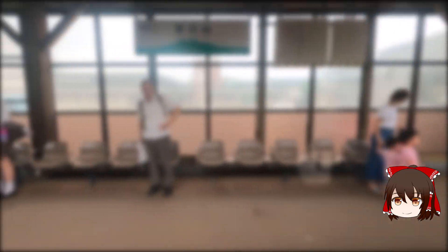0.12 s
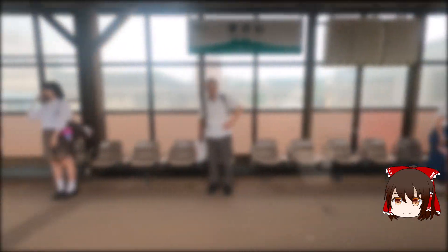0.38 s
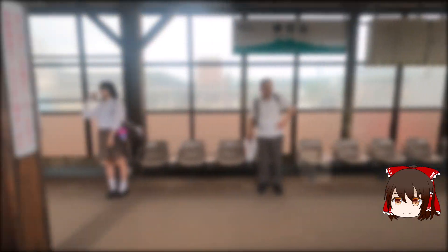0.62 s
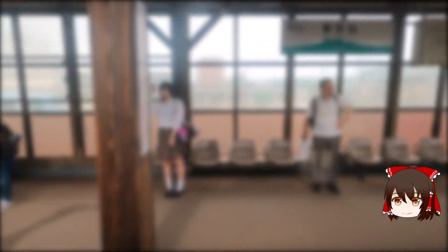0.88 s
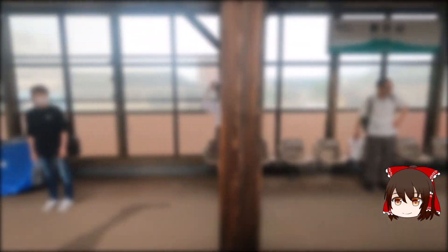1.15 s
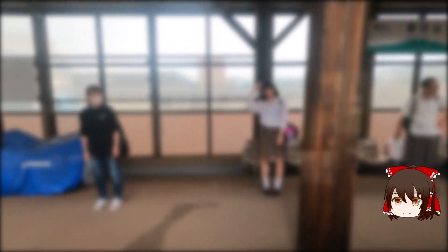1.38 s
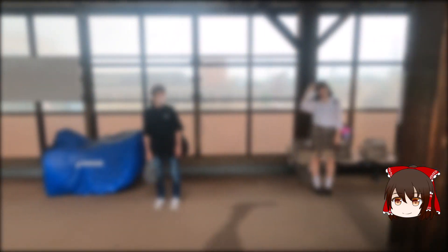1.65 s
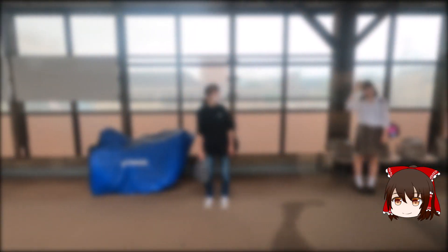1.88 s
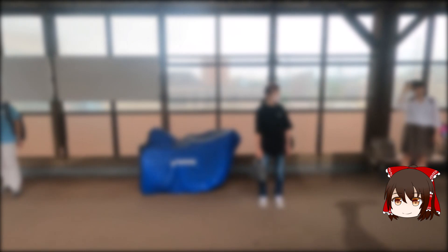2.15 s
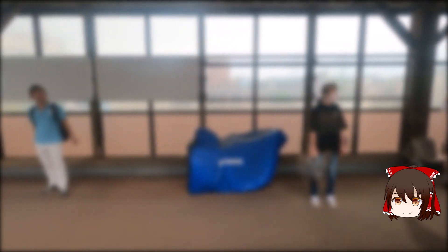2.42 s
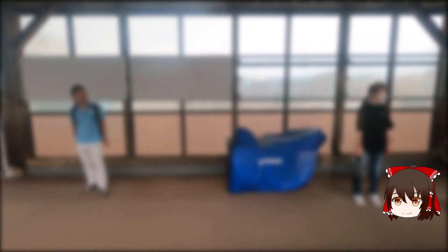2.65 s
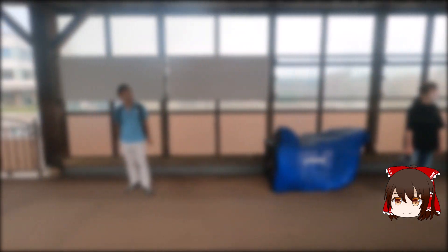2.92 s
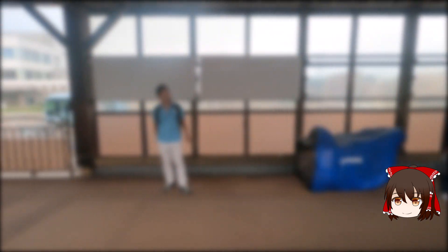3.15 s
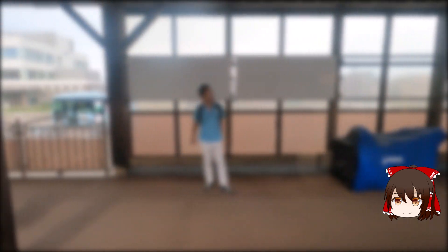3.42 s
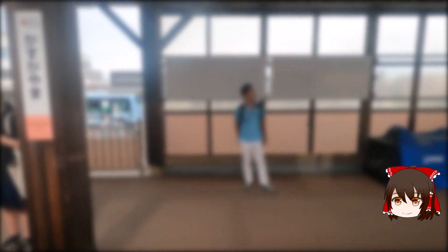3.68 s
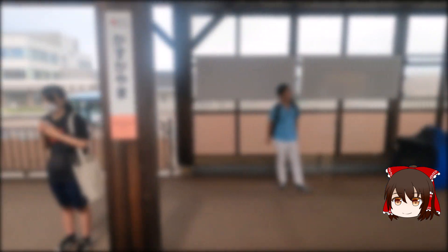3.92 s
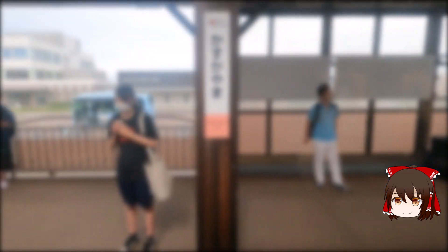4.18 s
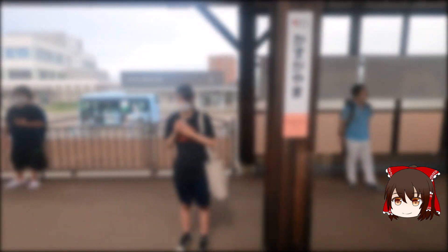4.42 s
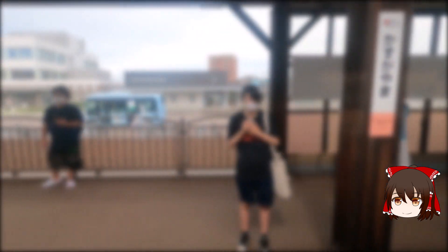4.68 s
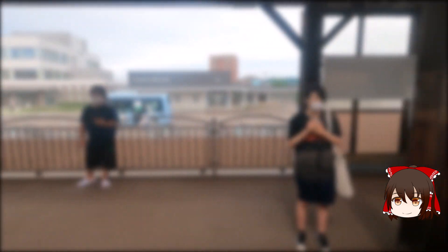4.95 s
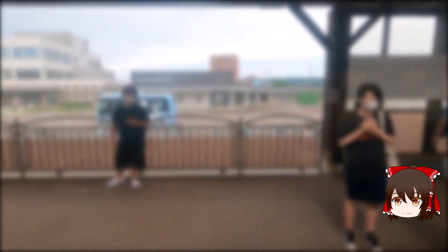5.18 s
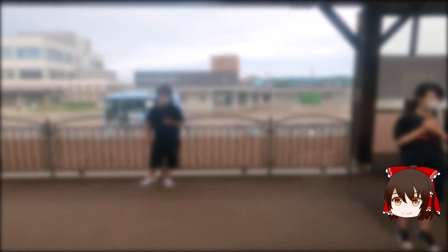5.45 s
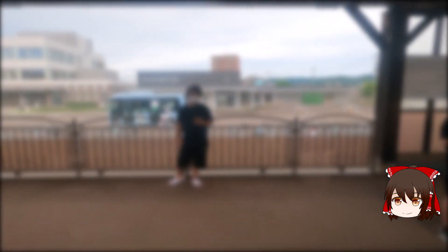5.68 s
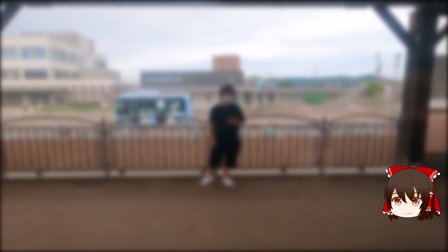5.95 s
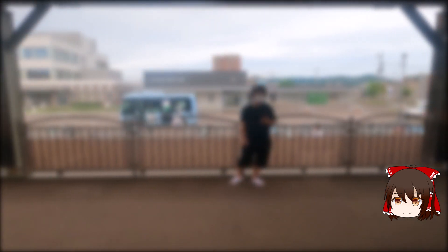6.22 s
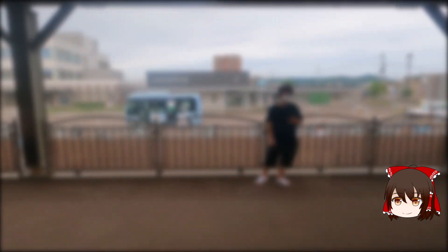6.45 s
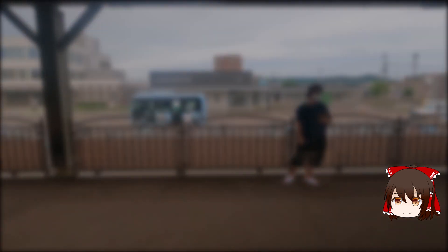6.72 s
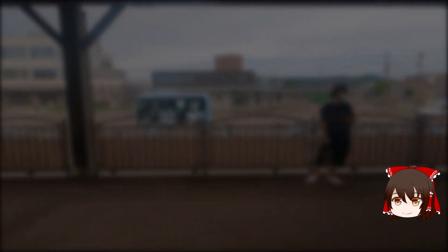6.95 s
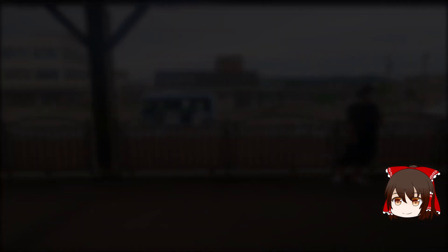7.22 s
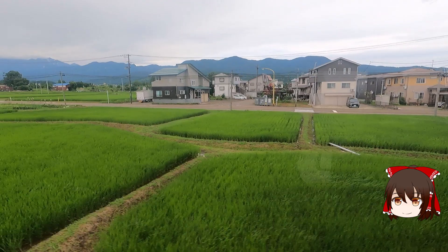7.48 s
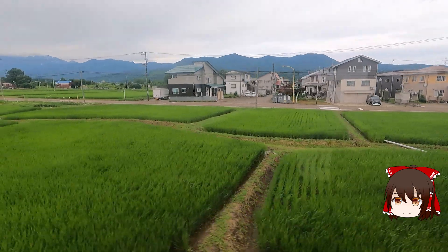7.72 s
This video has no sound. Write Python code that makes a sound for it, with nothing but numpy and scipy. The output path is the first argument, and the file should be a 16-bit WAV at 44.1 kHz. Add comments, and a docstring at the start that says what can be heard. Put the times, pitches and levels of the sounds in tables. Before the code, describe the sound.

Stereo microphone in a train carriage: continuous low wheel roar, body sway and soft duct hiss, with cooling machines humming almost in unison. Small dry clicks come sparsely, and a low lurch thumps near the middle. The sound sinks over about a second into silence, then cuts back abruptly to open-line rolling, with more bass sway, thin top hiss and several quick rattling knocks.

```python
"""Inside a slowly rolling electric train

Shaped random noise makes the swaying car body, droning panels, wheel roar and air hiss.
Two cooling machines hum almost in unison as beating sinusoids, with a wavering whine and faint tones.
Struck modes make small ticks and knocks in the fittings.
The sound fades out over a second and comes back at once, out on the open line."""
import sys
import numpy as np
from scipy import signal
from scipy.fft import rfft, irfft
from scipy.io import wavfile
from scipy.ndimage import uniform_filter1d

SR = 44100
rng = np.random.default_rng(int(sys.argv[2]) if len(sys.argv) > 2 else 0)


def transcribe(u):
    """Save the signal u as a 16-bit wav file named by the first command-line argument.

    u: samples, shape (n,) or (channels, n), limited to [-1, 1]; the rate is SR.
    q: integer samples, one column per channel.
    """
    v = np.clip(np.atleast_2d(u).T, -1, 1)
    q = np.round(v * 32767).astype(np.int16)
    wavfile.write(sys.argv[1], SR, q)


def undo_db(level):
    """Turn decibels back into plain size, where 20 dB means ten times bigger."""
    steps = np.asarray(level, float) / 20
    return 10 ** steps


N = 346175
T = np.arange(N) / SR  # s
BACK_S = 7.3856  # the sound returns, on the open line
OPEN = T > BACK_S

# noise spectra of the rolling car: (frequency [Hz], density [dB per Hz])
SWAY_SPECTRUM = [(8, -40), (14, -14), (20, 0), (30, -4), (42, -2), (52, -2), (62, -11), (80, -30),
                 (160, -150)]
DRONE_SPECTRUM = [(30, -70), (66, -14), (80, -10), (90, -6), (100, -6), (112, 0), (126, -1), (150, 0),
                  (165, -7), (178, -18), (200, -30), (400, -150)]
ROAR_SPECTRUM = [(40, -12.5), (75, -0.5), (150, -6), (178, -2.5), (205, 1.5), (228, -7), (255, -1.5),
                 (288, -8.5), (310, -9.5), (420, -13.5), (530, -10.5), (640, -14.5), (1000, -16.5),
                 (1220, -20.5), (1400, -22.5), (1600, -26), (2000, -31), (3000, -70), (8000, -140)]
# air ducts and track hiss through the microphone's treble bump: (frequency [Hz], density [dB per Hz])
HISS_SPECTRUM = [(900, -19.5), (1800, 1.5), (2300, 0), (2600, -1), (3000, -3.5), (3900, -6), (4500, -10),
                 (5000, -12), (5800, -12), (6750, -7), (7600, -12), (8600, -22), (9300, -29.5),
                 (11000, -38.5), (11800, -38), (13300, -45.5), (14500, -57.5)]
# thin top hiss of the open line: (frequency [Hz], density [dB per Hz])
AIR_SPECTRUM = [(7000, -80), (9000, -4), (10300, 1), (11000, -4), (12000, -19), (15000, -79)]
# sway over time, with one long lurch: (time [s], level [dB])
SWAY_LEVEL = [(0, -2.5), (1.3, 0), (1.9, -3.7), (3.2, -2.5), (3.5, 11), (3.85, 9.5), (4.25, 4), (4.7, 3),
              (6.4, 0.5), (7.4, -1.5)]
# floor drone over time: (time [s], level [dB])
DRONE_LEVEL = [(0, -2), (.9, -0.8), (1.5, -3), (2.4, -2.5), (2.8, 1.5), (3.7, -1.2), (4.4, 0.3), (7.4, 1)]
# course shared by wheel roar and hisses: (time [s], level [dB])
ROLL_LEVEL = [(0, 0.2), (1.3, -1), (3.0, -0.3), (3.4, 0.5), (6.3, 0.8), (7.4, 0.5)]
# low wheel growl within the roar: (time [s], level [dB])
GROWL_LEVEL = [(0, -0.5), (2, 0.5), (3.7, -0.5), (4.6, 0), (5.3, 1.5), (6.1, 1), (6.4, 0), (7.4, 0.5)]
# part of the right port unrelated to the left: (frequency [Hz], level [dB])
UNLIKE_SHARE = [(60, -40), (180, -29), (250, -17), (310, -14.5), (540, -9.5), (1000, -4.5), (1400, -3.4),
                (2000, -2.4), (3000, -1.6), (4500, -1), (5600, -2.7), (6750, -6.2), (8100, -6.5),
                (9600, -4), (12000, -.3)]
# phase by which the left port leads the right: (frequency [Hz], phase [rad])
LEFT_LEAD = [(0, 0), (1000, 0), (1550, -.1), (2760, 1), (3620, .9), (3960, .1), (5000, -.1), (8440, 0)]
# left port over right port: (frequency [Hz], level [dB])
LEFT_OVER_RIGHT = [(0, 0), (180, 0), (310, -.4), (540, -1.1), (1600, -.9), (4800, -.6), (8300, -.2)]
# standing waves of the cabin, peaks and dips: (frequency [Hz], width [Hz], gain [dB])
CABIN_MODES = [(35, 4, -5), (76, 8, -3), (87, 5, 2), (96, 6, -3), (110, 6, 2), (152, 6, 3), (180, 8, -3),
               (194, 5, 2.5), (213, 5, 3.5), (227, 7, -4), (240, 5, -2), (255, 10, 2), (282, 6, -2),
               (310, 12, -5), (326, 6, 3), (346, 6, -2.5), (385, 12, -2), (810, 50, -1.5), (875, 20, -2.5),
               (925, 35, 2), (1160, 35, 2), (1410, 40, 2), (2780, 120, 1.5), (3250, 250, 1),
               (3620, 180, -2.5), (3840, 100, 1)]
# octave of the second shaft: (time [s], level [dB])
OCTAVE_LEVEL = [(0, -25.5), (1.2, -27.5), (2.1, -25.5), (2.9, -31.5), (3.7, -35), (4.2, -28), (5.4, -37.5),
                (5.8, -30.5), (7.4, -39)]
# partials of the blade whine: (multiple of its pitch [1], level [dB])
WHINE_PARTIALS = [(.5, -6.5), (1, 0), (1.5, -15)]
# blade whine over time: (time [s], level [dB])
WHINE_LEVEL = [(0, 2), (.4, 2), (1, 0.5), (2.2, -1), (2.9, -1.5), (4.2, 0), (5.3, 2), (5.6, -5), (6.3, 2),
               (6.6, 0), (7.4, 2)]
# other faint tones: (frequency [Hz], level [dB])
FAINT_TONES = [(1413, -69), (1730, -74), (2040, -75), (2764, -80), (3822, -85), (4312, -88), (11800, -111),
               (12201, -115)]
# modes of a loose fitting, before the hardness tilt: (frequency [Hz], level [dB], decay by 60 dB [s])
FITTING_MODES = [(420, -7, .05), (1000, -10, .02), (1480, -2, .045), (1720, 0, .04), (2620, -2, .028),
                 (4150, -6, .022), (5900, -13, .018), (7400, -12, .02), (8100, -20, .018),
                 (8900, -32, .018), (10400, -42, .018), (12200, -53, .02), (14000, -68, .015)]
# single blows: (time [s], blow [dB], hardness [dB per octave], left over right [dB], rise [s])
KNOCKS = [(.5257, -74, 15, -.5, .0012), (.6853, -74, 14, -2, .002), (3.1398, -71, 12, 0, .003),
          (3.30, -52, -1, 0, .004), (3.567, -66, 8, 0, .002), (3.936, -44, -5, -3, .002),
          (5.0848, -67, 12, -.5, .002), (5.7982, -62, 7, -.5, .002), (6.367, -72, 11, -.5, .003),
          (6.3825, -63, 11, -.5, .003), (7.4770, -38.5, 1, -4, .0012), (7.4845, -42, -4, -4, .002),
          (7.5538, -40.5, -5, -3, .0015), (7.560, -44, -6, -3, .002), (7.593, -41, -6, -3, .002)]

FIRST_HZ, SECOND_HZ = 57.64, 58.16  # shaft pitches
IN_STEP_S = 1.05  # the two shafts beat; here they push together
TURN = 2 * np.pi * (T - IN_STEP_S)  # phase of a 1 Hz rotation, rad


def curve(table, t):
    """Linear interpolation: a level curve at times t."""
    return np.interp(t, *np.transpose(table))


def read(points, hz):
    """Logarithmic frequency scale: a spectrum table joined by straight lines over log frequency."""
    f, value = np.transpose(points)
    return np.interp(np.log(hz + 1), np.log(f + 1), value)


def evened(x):
    """Power normalization: scaled to rms 1."""
    return x / np.sqrt(np.mean(abs(x) ** 2) + 1e-20)


def ports(hz, near, other):
    """Partial coherence: two ports alike in the bass, partly unrelated and phase-shifted higher up."""
    unlike = np.clip(undo_db(read(UNLIKE_SHARE, hz)), 0, 1)
    right = np.sqrt(1 - unlike ** 2) * near + unlike * other
    right = right * np.exp(-1j * read(LEFT_LEAD, hz))
    half_db = read(LEFT_OVER_RIGHT, hz) / 2
    return np.array([near * undo_db(half_db), right * undo_db(-half_db)])


def wash(shape, db, size, patchy_db, flicker_db):
    """Short-time synthesis: random spectra with drifting patches and a flicker common to all frequencies."""
    frames, hz = 4 * N // size + 6, np.fft.rfftfreq(size, 1 / SR)
    a, b, c, d, patches = rng.standard_normal((5, frames, len(hz)))
    patches = uniform_filter1d(patches, size=6, axis=0)
    patches = evened(uniform_filter1d(patches, size=10, axis=1))
    flicker = evened(uniform_filter1d(rng.standard_normal((frames, 1)), size=5, axis=0))
    gain_db = read(shape, hz) + patchy_db * patches + flicker_db * flicker
    z = ports(hz, a + 1j * b, c + 1j * d) * undo_db(gain_db)
    x = signal.istft(z.transpose(0, 2, 1), nperseg=size, noverlap=size * 3 // 4)[1][:, :N]
    return evened(x) * undo_db(db)


def roll_db():
    """Common modulation: one level course for roar and hisses, swelling by 1 dB/s on the open line."""
    return curve(ROLL_LEVEL, T) + OPEN * (0.2 + 1 * (T - BACK_S))


def body_sway():
    """Low-frequency random vibration: the car body sways, more strongly on the open line."""
    db = -38 + curve(SWAY_LEVEL, T) + OPEN * 9.5
    return wash(SWAY_SPECTRUM, db, size=8192, patchy_db=2.0, flicker_db=1.0)


def panel_drone():
    """Panel radiation: a narrow low noise band, weaker on the open line."""
    db = -29 + curve(DRONE_LEVEL, T) + OPEN * -3
    return wash(DRONE_SPECTRUM, db, size=8192, patchy_db=0.2, flicker_db=0.3)


def wheel_roar():
    """Rolling noise: a broad roar whose part below the growl limit follows its own level."""
    growl_limit_hz = 327
    roar = wash(ROAR_SPECTRUM, -33 + roll_db(), size=2048, patchy_db=1.0, flicker_db=0.4)
    lowpass = signal.butter(4, growl_limit_hz, fs=SR, output="sos")
    growl = signal.sosfiltfilt(lowpass, roar)
    return roar - growl + growl * undo_db(curve(GROWL_LEVEL, T) + OPEN * -0.5)


def air_hiss():
    """Turbulence noise: air ducts and track hiss as a treble band that follows the rolling."""
    return wash(HISS_SPECTRUM, -52.5 + roll_db(), size=512, patchy_db=.5, flicker_db=.5)


def shaft_hum():
    """Beating: two shafts half a hertz apart drift in and out of step, both sagging in level."""
    first = undo_db(-28.5 - 0.6 * T) * np.cos(FIRST_HZ * TURN)
    second = undo_db(-38.5 - 0.9 * T) * np.cos(SECOND_HZ * TURN)
    octave_db = curve(OCTAVE_LEVEL, T) + OPEN * 9.5
    octave = undo_db(octave_db) * np.cos(2 * SECOND_HZ * TURN + 1.44)
    return np.sqrt(2) * (first + second + octave)  # the levels are rms


def narrow_fuzz():
    """Resonant filtering: complex noise through a double pole leaves a slow random waver."""
    pole_width_hz = 16  # of each pole
    r = np.exp(-np.pi * pole_width_hz / SR)
    noise = rng.standard_normal(N) + 1j * rng.standard_normal(N)
    return evened(signal.lfilter([1], [1, -2 * r, r * r], noise))


def blade_whine(fuzz):
    """Narrow-band modulation: the blades' partials, each a steady tone plus fuzz, waver together."""
    whine_hz, steadiness = 573.9, 2.4  # steadiness: steady tone over its fuzz
    partials = sum(
        undo_db(db) * evened(((steadiness + fuzz) * np.exp(1j * k * whine_hz * TURN)).real)
        for k, db in WHINE_PARTIALS)
    whine = undo_db(-47 + curve(WHINE_LEVEL, T) + OPEN * 3) * partials
    return whine * undo_db(read(LEFT_OVER_RIGHT, whine_hz) * np.array([[.5], [-.5]]))


def faint_tones(fuzz):
    """Interaural phase: wavering tones of fixed pitch, each reaching the two ports out of step."""
    tones = np.zeros((2, N))
    for (hz, db), lag in zip(FAINT_TONES, rng.standard_normal(len(FAINT_TONES))):
        phase = hz * TURN + np.array([[0], [1]]) * lag
        tones += undo_db(db) * evened(((1 + fuzz) * np.exp(1j * phase)).real)
    return tones


def ring(hardness_db, rise, draw):
    """Modal decay: detuned modes roughened by a rattling contact, with a short crack and its echo."""
    t = np.arange(4096) / SR
    hz, db, t60 = np.transpose(FITTING_MODES)[:, :, None]
    db = db + hardness_db * np.log2(hz / 1700)  # a harder blow favours the treble
    detuned_hz = hz * (1 + .02 * draw[:len(hz), None])
    phase = 2 * np.pi * (detuned_hz * t + .05 * draw[-len(hz):, None])  # set off nearly together
    modes = undo_db(db - 60 * t / t60) * np.sin(phase)
    rough = 1 + .5 * evened(uniform_filter1d(uniform_filter1d(draw, size=20), size=20))
    # broadband snap of the contact, coloured like the modes
    colour = undo_db(read(np.hstack([hz, db]), np.fft.rfftfreq(len(t), 1 / SR)))
    snap = irfft(rfft(draw) * colour)
    crack_decay = undo_db(10 - 60 * t / .02)  # 60 dB in .02 s
    echo_decay = undo_db(-60 * t / .11)  # the cabin's noisy echo, 60 dB in .11 s
    onset = np.sin(np.pi / 2 * np.minimum(t / rise, 1)) ** 2
    return (modes.sum(0) * rough + snap * (crack_decay + echo_decay)) * onset


def fitting_ticks():
    """Poisson process: faint random ticks of the fitting, in six variants spread from left to right."""
    ticks_per_s, floor_db, spread_db = 12, -80, 4
    db = floor_db + spread_db * np.minimum(rng.exponential(1, N), 4)
    size = undo_db(db) * (rng.random(N) < ticks_per_s / SR)
    kind = rng.integers(0, 6, N)
    out = np.zeros((2, N))
    for k, draw in enumerate(rng.standard_normal((6, 4096))):
        tick = ring(6, .0015, draw)  # hardness dB per octave, rise s
        out += signal.oaconvolve(size * (kind == k), tick)[:N] * undo_db([[2 - k], [k - 3]])
    return out


def fitting_knocks():
    """Impact excitation: single blows on the fitting, with reflections that differ per port."""
    out = np.zeros((2, N + 4096))
    draws = rng.standard_normal((len(KNOCKS), 2, 4096))
    for (s, db, hardness_db, pan_db, rise), draw in zip(KNOCKS, draws):
        middle = ring(hardness_db, rise, draw[0])
        side = .5 * ring(hardness_db, rise, draw[1])
        gain = undo_db(db + np.array([[.5], [-.5]]) * pan_db)
        out[:, round(s * SR):][:, :4096] += gain * np.array([middle + side, middle - side])
    return out[:, :N]


def open_line_air():
    """Gated turbulence noise: a thin flickering top hiss, heard only on the open line."""
    return wash(AIR_SPECTRUM, -84 + roll_db(), size=512, patchy_db=-3.0, flicker_db=2.0) * OPEN


def cabin(x):
    """Room modes: standing waves raise and lower narrow bands of all the rolling noise."""
    hz = np.fft.rfftfreq(N, 1 / SR)
    gain_db = sum(db * np.exp(-(2 * (hz - f) / width) ** 2 / 2) for f, width, db in CABIN_MODES)
    return irfft(rfft(x) * undo_db(gain_db), N)


def scene():
    """Superposition: rolling noise in the cabin, cooling machines and fittings add together."""
    rolling = cabin(body_sway() + panel_drone() + wheel_roar() + air_hiss() + open_line_air())
    fuzz = narrow_fuzz()
    machines = shaft_hum() + blade_whine(fuzz) + faint_tones(fuzz)
    return rolling + machines + fitting_ticks() + fitting_knocks()


def roll_off(x):
    """The treble ends steeply here."""
    return signal.sosfilt(signal.butter(12, 14200, fs=SR, output="sos"), x)


def record(dry):
    """Amplitude envelope: a straight one-second fade to silence, then a return within a millisecond."""
    fade_s, return_s = 1.0, .001
    fall = np.clip((BACK_S - T) / fade_s, 0, 1)
    rise = np.minimum((T - BACK_S) / return_s, 1)
    mix = dry * np.where(T < BACK_S, fall, rise)
    return roll_off(mix)


dry = scene()
out = record(dry)
transcribe(out)
```